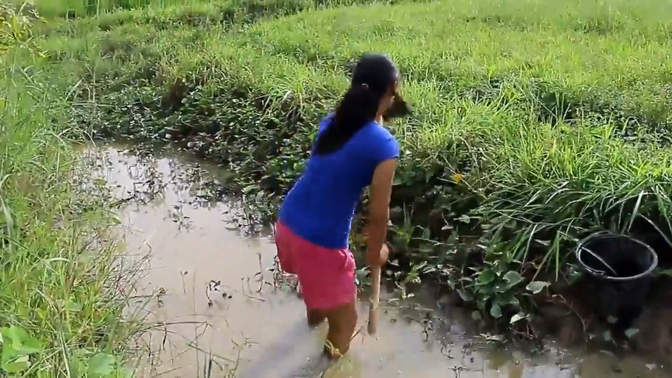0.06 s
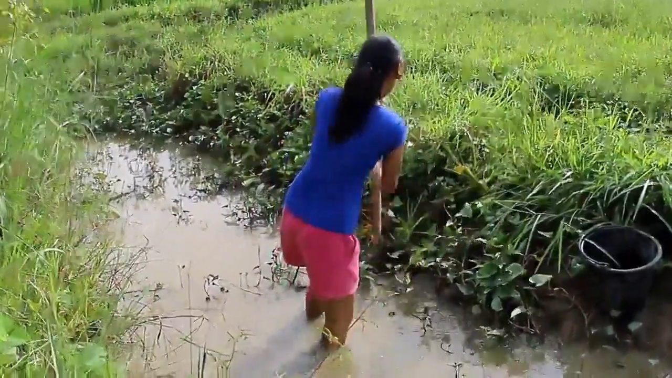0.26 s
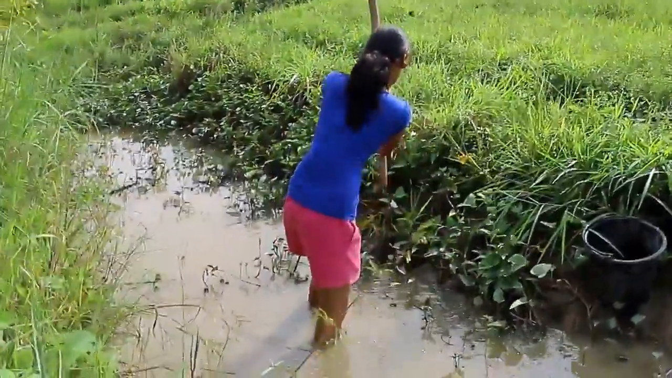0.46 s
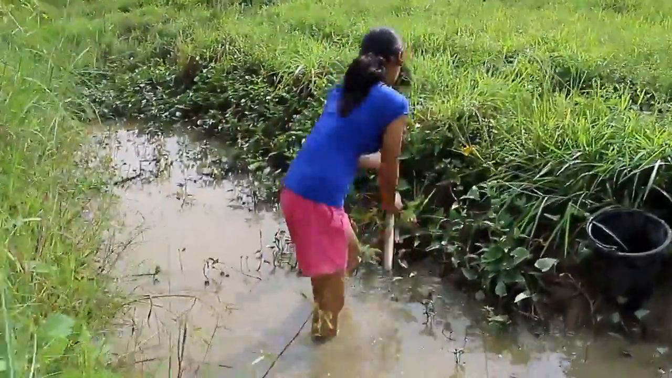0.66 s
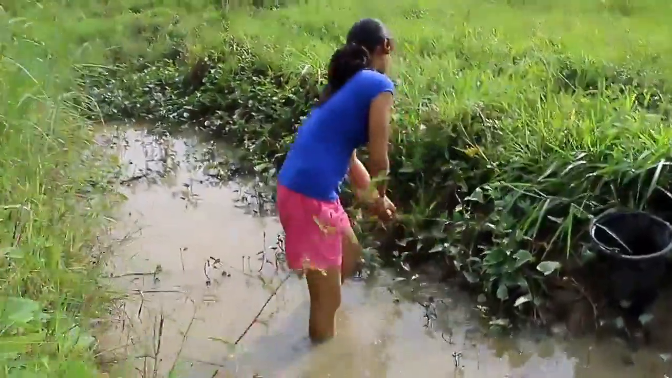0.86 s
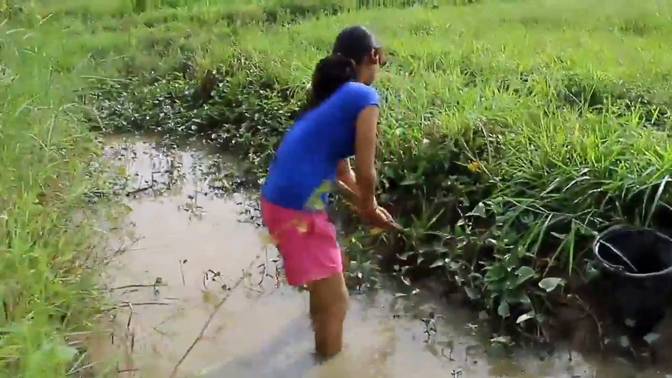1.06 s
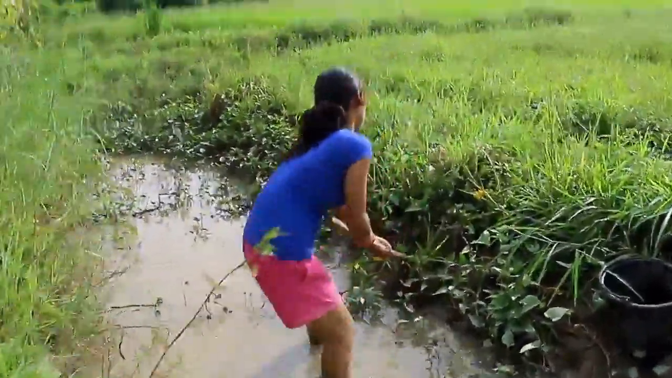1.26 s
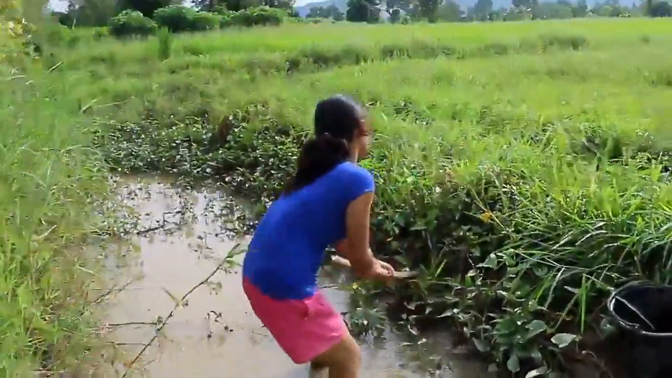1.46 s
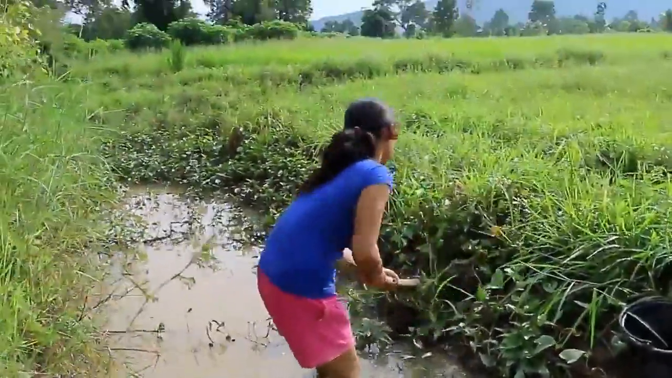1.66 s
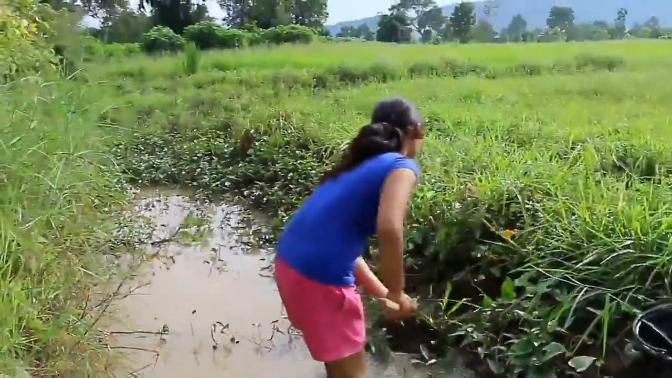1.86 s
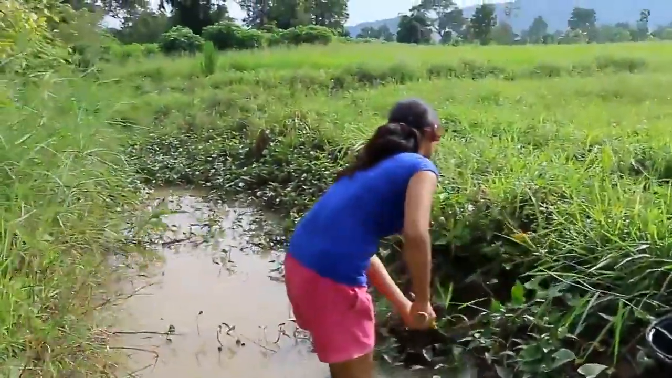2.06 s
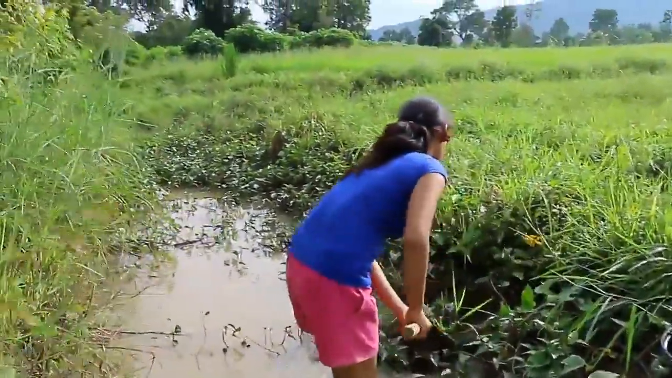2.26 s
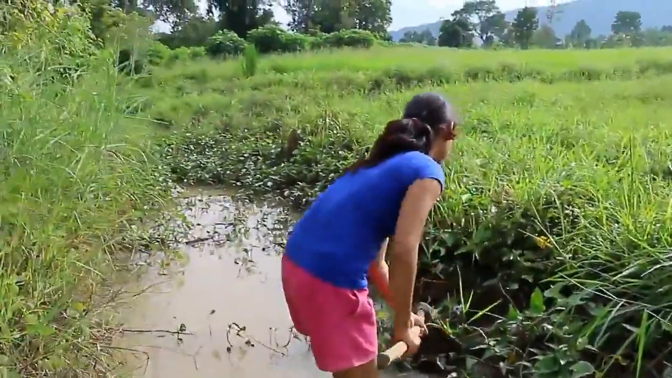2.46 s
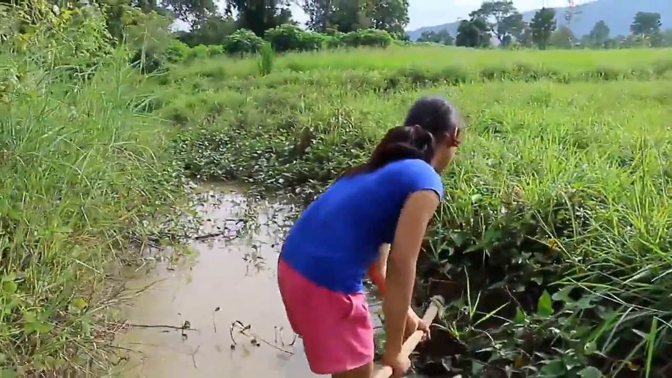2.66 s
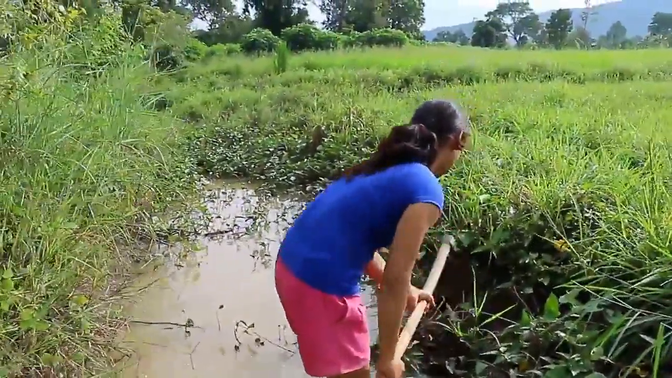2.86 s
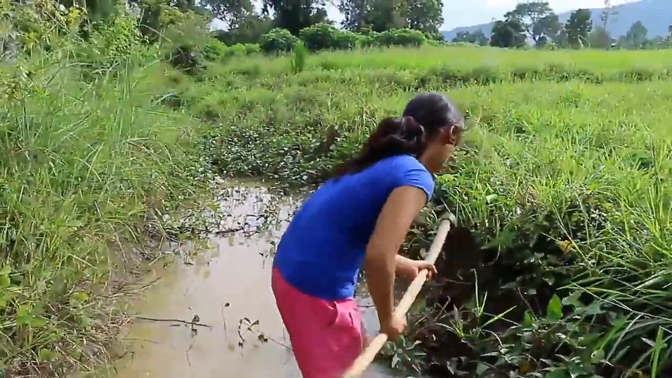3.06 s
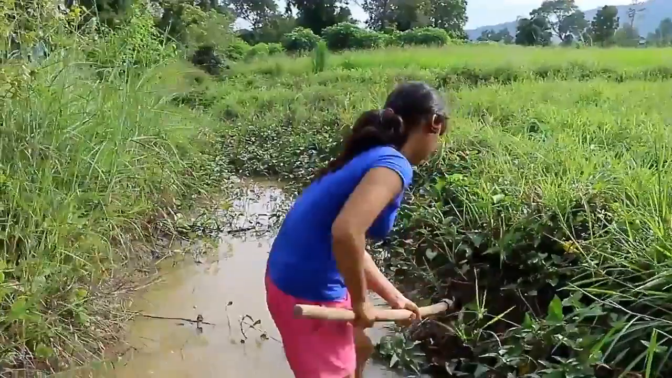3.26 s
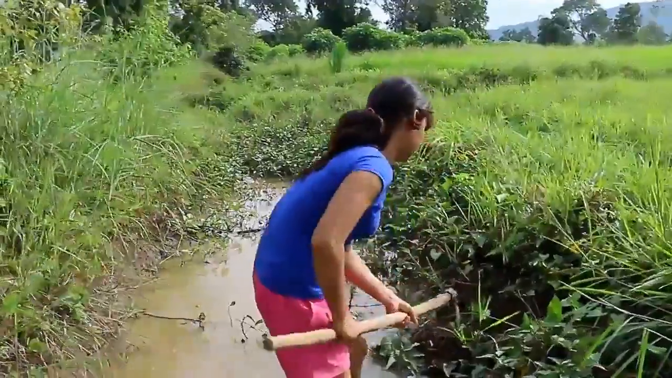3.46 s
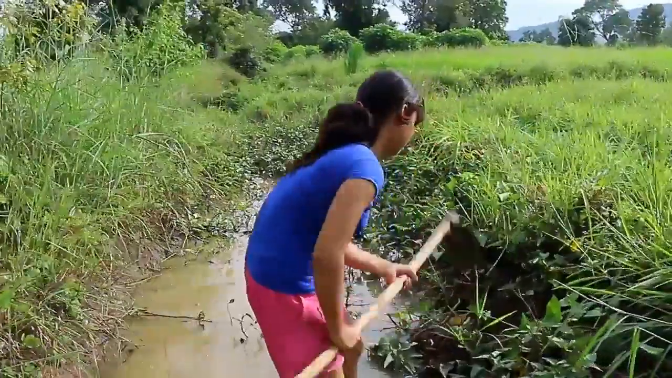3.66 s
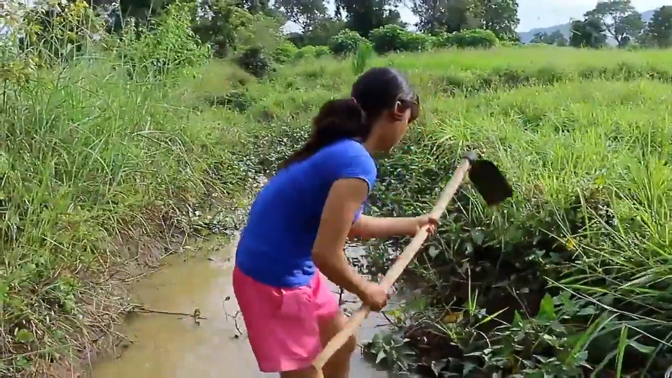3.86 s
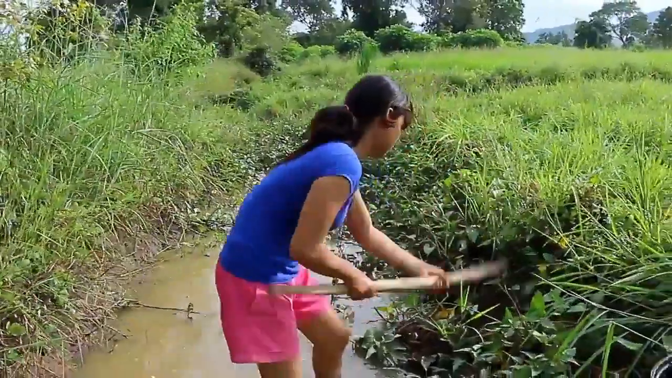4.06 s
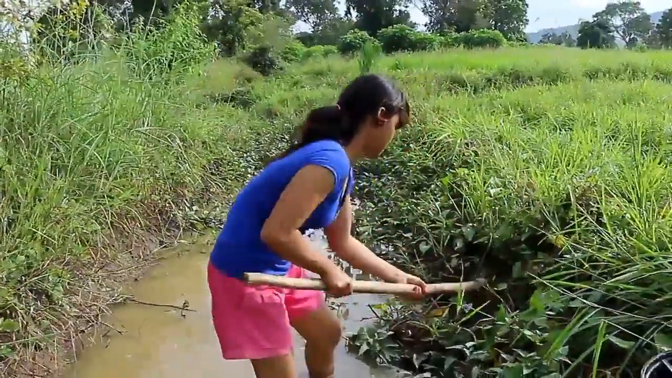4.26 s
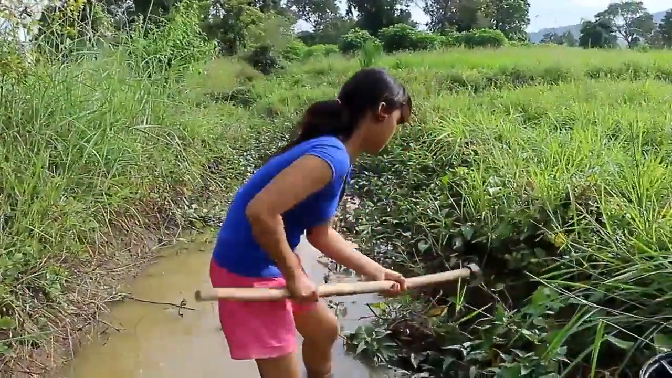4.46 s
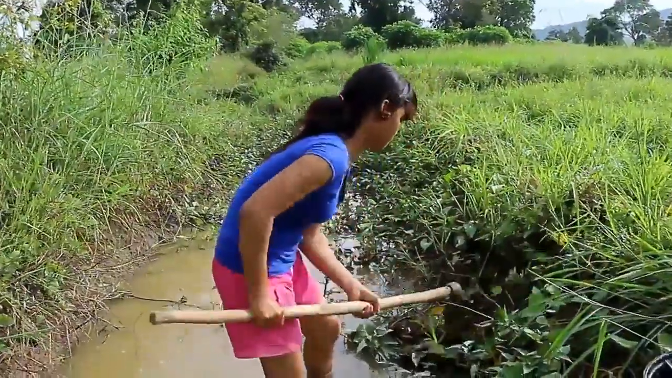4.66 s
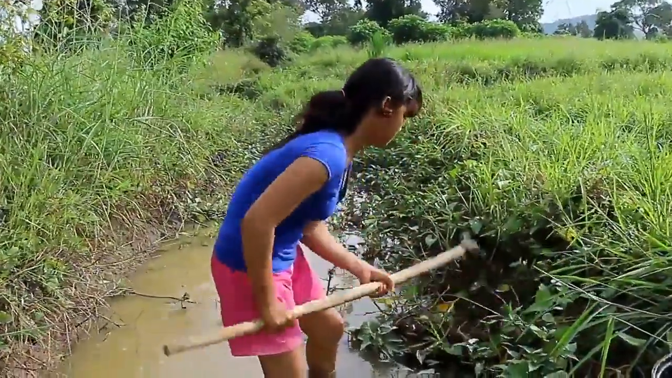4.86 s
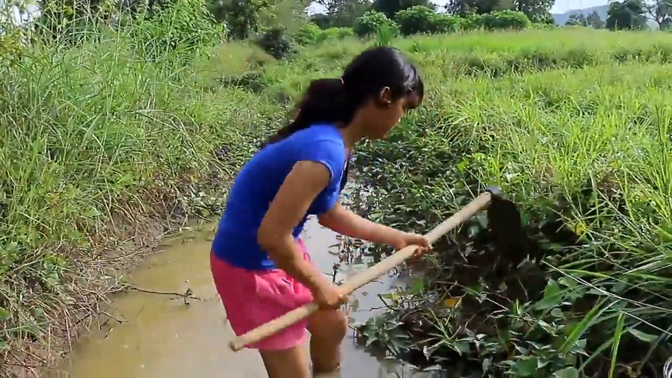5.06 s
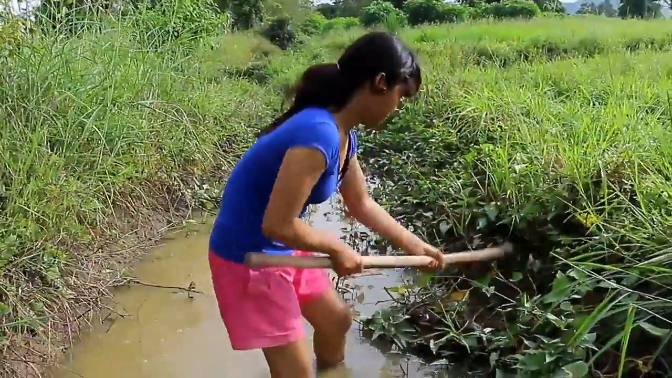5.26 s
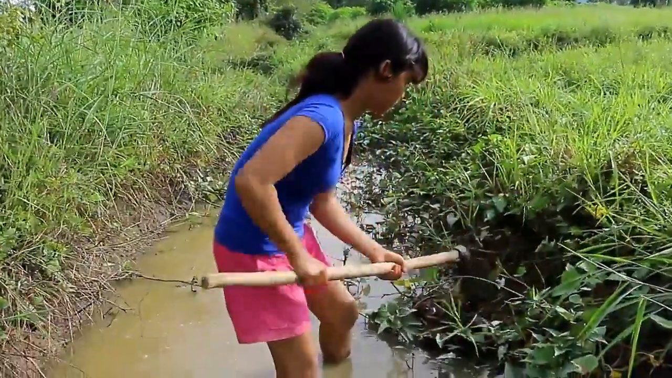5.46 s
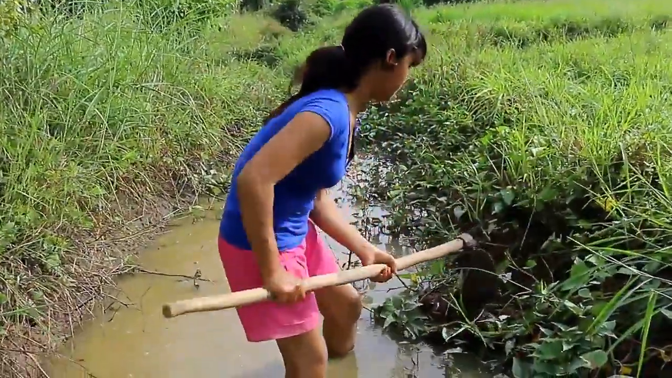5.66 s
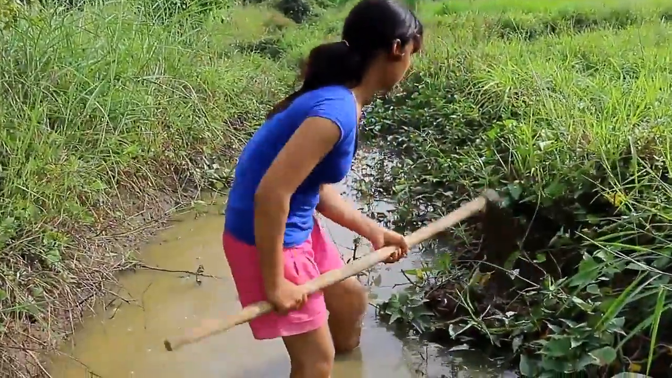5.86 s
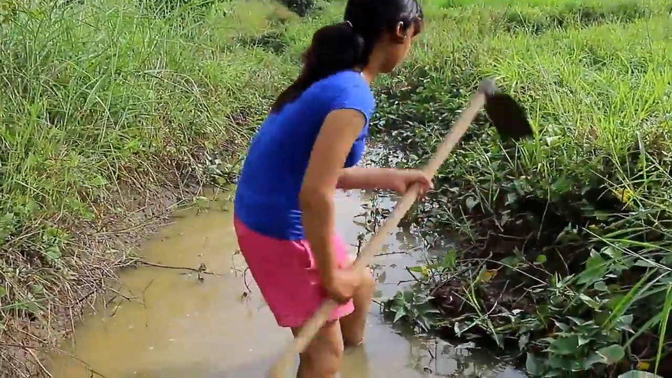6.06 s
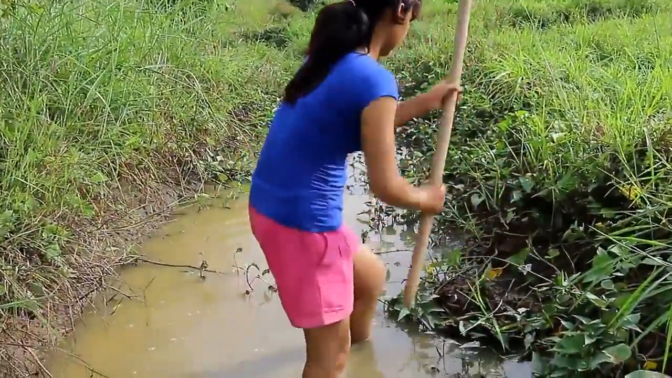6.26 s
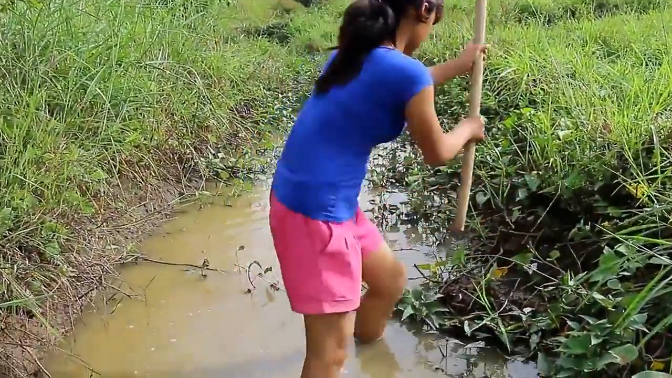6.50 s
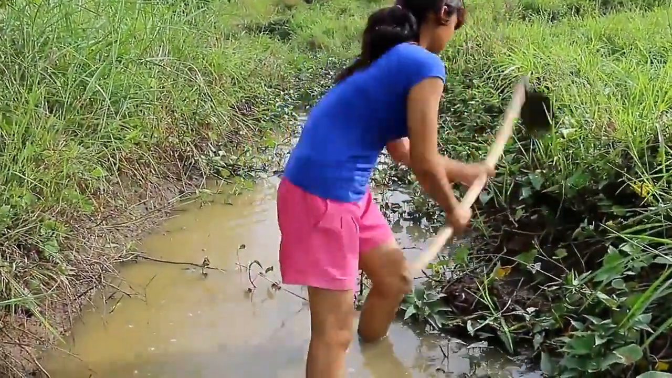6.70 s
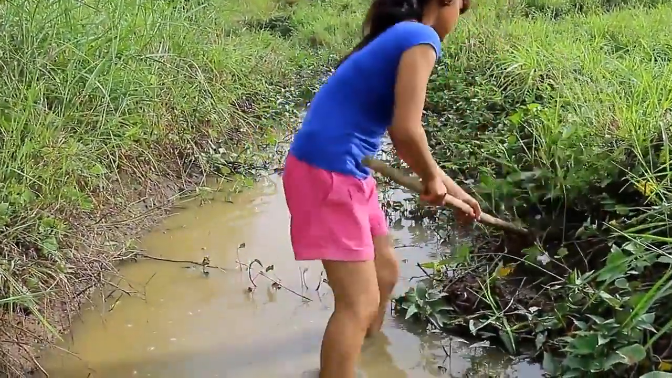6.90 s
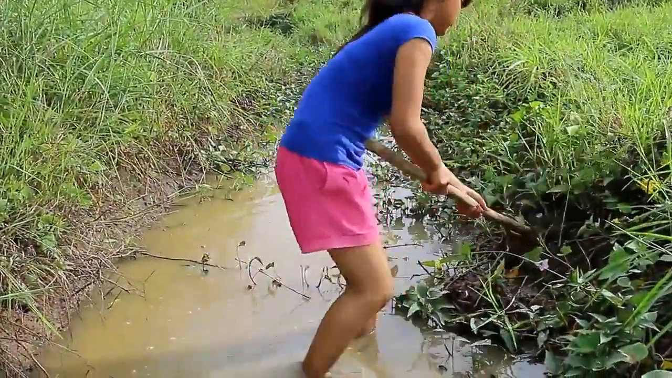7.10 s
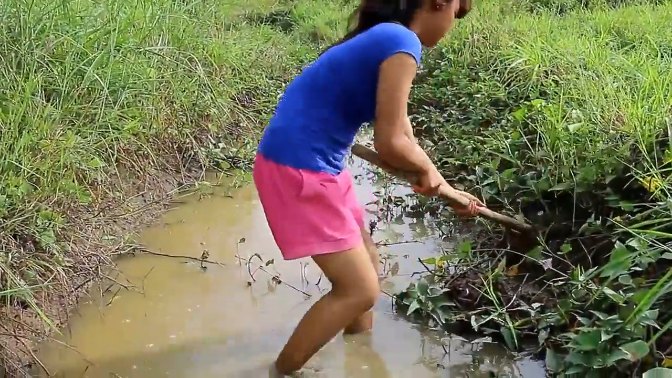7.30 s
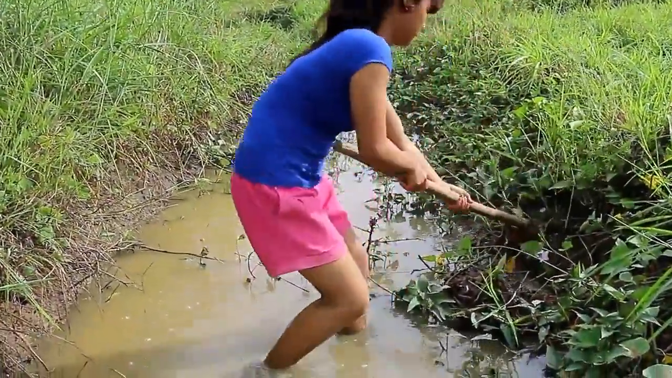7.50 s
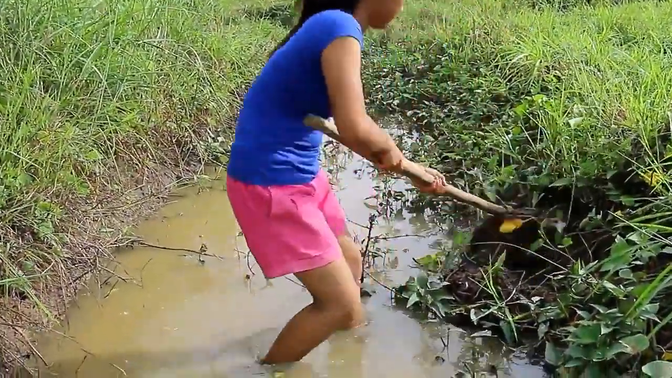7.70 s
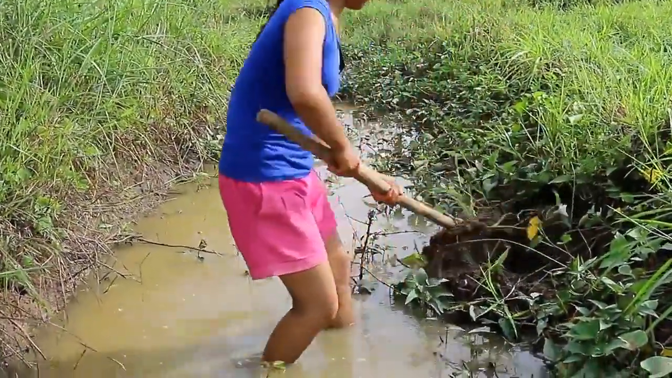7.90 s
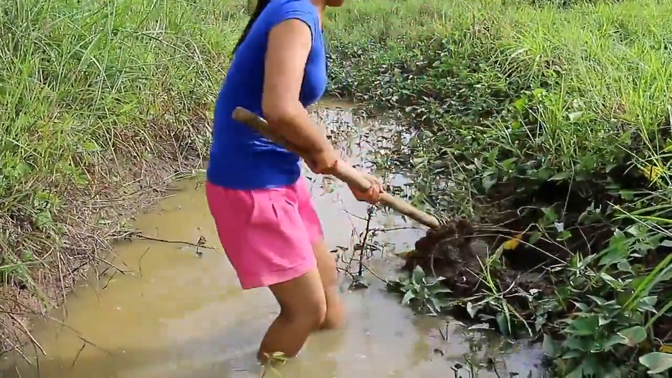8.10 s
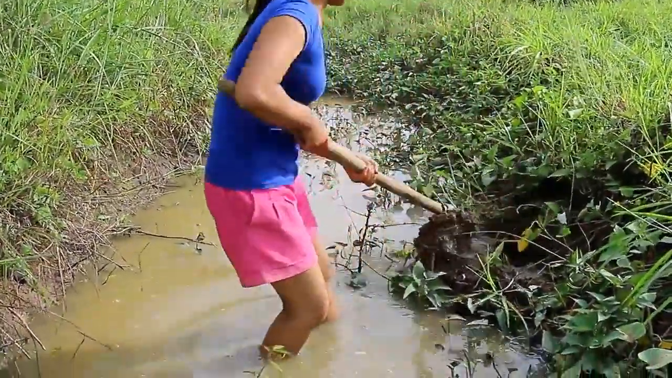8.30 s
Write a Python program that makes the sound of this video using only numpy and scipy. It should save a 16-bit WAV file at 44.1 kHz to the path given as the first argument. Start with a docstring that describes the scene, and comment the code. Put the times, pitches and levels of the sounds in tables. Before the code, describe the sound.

In an open field, a hoe tears through weeds and lands in mud with a sharp crack and thud. Legs then stir shallow ditch water into sloshes, plops and a splash. Lighter chops follow, then another hard one, and wet leaves rustle near the end. The work is close and central, while a frog croaks in short pulses on the right and a small bird trills on the left over faint insect buzz.

```python
"""A muddy ditch in an open field. A hoe chops at the weedy bank: the blade tears through stems and
lands with a crack and a thud. Shifting feet and dragged wet plants stir the water into bubbles,
slosh and spray. On the right a frog pulses its vocal sac, on the left a small bird trills in
falling slides. Behind them lie a far whistle, throbbing insect wings and a low, wavering hum."""
import sys
import numpy as np
from scipy import signal
from scipy.io import wavfile

SR = 44100
rng = np.random.default_rng(int(sys.argv[2]) if len(sys.argv) > 2 else 0)


def bounce(signal):
    """Save signal as a 16-bit WAV file at the path given by the first command-line argument."""
    frames = np.transpose(np.atleast_2d(signal))
    limited = np.clip(frames, -1, 1)
    pcm = np.round(limited * 32767).astype(np.int16)
    wavfile.write(sys.argv[1], SR, pcm)


N = 367794
TIME = np.arange(N) / SR


def amp(db):
    """Turn dB into gain."""
    return np.exp(np.asarray(db) * (np.log(10) / 20))


def rms_one(x):
    """Scale to rms 1."""
    return x / np.sqrt(np.mean(x ** 2) + 1e-20)


def at_hz(points, hz):
    """Read a curve on a log-frequency axis."""
    freqs, values = np.transpose(points)
    return np.interp(np.log(hz), np.log(freqs), values)


def drift(rate_hz):
    """A smooth random modulator with a spread of 1."""
    r = np.exp(-80 * np.pi * rate_hz / SR)
    slow = signal.lfilter([1], [1, -2 * r, r * r], rng.standard_normal(N // 40 + 2002))[2000:]
    return np.interp(np.arange(N) / 40, np.arange(len(slow)), rms_one(slow))


def ring(clicks, hz, t60):
    """A resonator: a unit click sets a sine of height 1 ringing."""
    r, w = amp(-60 / (t60 * SR)), 2 * np.pi * hz / SR
    return signal.lfilter([0, np.sin(w)], [1, -2 * r * np.cos(w), r * r], clicks + 1e-18)


def add(out, start, piece):
    """Mix a piece in at a start time in seconds."""
    i = round(start * SR)
    out[i:i + len(piece)] += piece[:N - i]


def placed(x, pan_db, lag):
    """Pan a mono sound: the left is louder by pan_db and late by lag samples."""
    late = np.interp(np.arange(N) - lag, np.arange(N), x)
    return np.array([late * amp(pan_db / 2), x * amp(-pan_db / 2)])


def crackle(per_s, spread_db, hiss):
    """Clumps of uneven clicks on a bed of noise, as a mid/side pair."""
    sizes = amp(spread_db * np.minimum(rng.exponential(1, N), 4))
    fires = rng.random(N) < per_s * amp(4 * drift(25)) / SR
    return (rms_one(sizes * fires) + hiss) * rng.standard_normal((2, N))


def crack(db, fade_db, top_hz):
    """A few milliseconds of band-passed noise, dying by fade_db each sample."""
    burst = amp(db + 4 - fade_db * np.arange(300)) * rng.standard_normal(300)
    return signal.sosfilt(signal.butter(2, [500, top_hz], "band", fs=SR, output="sos"), burst)


def glide(length, start_hz, end_hz):
    """A sine that slides in pitch under a rounded envelope."""
    u = np.arange(round(length * SR)) / (length * SR)
    hz = start_hz + (end_hz - start_hz) * u ** 1.4
    return 2 * np.sin(np.pi * u) ** .5 * np.sin(2 * np.pi * np.cumsum(hz) / SR)


def bubble(hz, cycles, rise):
    """A bubble rings out over some cycles; a positive rise lifts its pitch as it nears the surface."""
    t = np.arange(round(cycles / hz * SR)) / SR
    u = t * hz / cycles
    attack = np.minimum(t * hz / 2, 1)
    return 2 * attack * amp(-60 * u) * np.sin(2 * np.pi * hz * t * (1 + rise * u))


# Stereo image of far sound. Each row: frequency in Hz, left-right likeness from 0 to 1.
FAR_LIKENESS = [(60, 0.64), (600, 0.59), (2000, 0.37), (5000, 0.013)]

def coloured(white, spectrum, flicker_db, flicker_hz, far):
    """Shape mid/side noise in flickering half-octave bands; far sources spread wider. Stereo, rms 1."""
    out, shared = 0, drift(flicker_hz)
    edges = spectrum[0][0] * 2 ** np.arange(0, 10, .5)
    edges = np.append(edges[edges < spectrum[-1][0] / 1.1], spectrum[-1][0])
    sources = white, white * rng.choice([-1, 1], N)   # neighbouring bands must not cancel
    for k, (low, high) in enumerate(zip(edges, edges[1:])):
        band = signal.butter(2, [low, high], "band", fs=SR, output="sos")
        mid, side = signal.sosfilt(band, sources[k % 2])
        hz = np.sqrt(low * high)
        alike = np.clip(at_hz(FAR_LIKENESS, hz), 0, 1) ** far
        gain = amp(at_hz(spectrum, hz) + flicker_db * (shared + drift(flicker_hz)))
        out = out + gain * (np.sqrt(1 + alike) * mid + np.sqrt(1 - alike) * side * [[1], [-1]])
    return rms_one(out)


def echoes(x, t60, level_db):
    """Scatter from banks and grass: a short noise tail, its own in each channel."""
    t = np.arange(round(.25 * SR)) / SR
    tail = rng.standard_normal((2, len(t))) * amp(-60 * t / t60) * (t > .004)
    tail /= np.sqrt(np.sum(tail[0] ** 2))
    return amp(level_db) * signal.fftconvolve(x[None], tail, axes=1)[:, :N]


# EQ of the ambience bed. Each row: frequency in Hz, relative level in dB.
FIELD_EQ = [(20, -22), (91, -3), (241, -2.5), (640, -8.5), (1250, -12), (9430, -17.5), (15800, -31)]

def open_field():
    """A wide, soft noise bed leaning right, with a low wavering hum from far off."""
    bed = coloured(rng.standard_normal((2, N)), FIELD_EQ, flicker_db=.4, flicker_hz=2.65, far=1)
    hum = rms_one(ring(rng.standard_normal(N), hz=91.7, t60=.15))
    return amp(-54.5) * bed * amp([[-.8], [.8]]) + amp(-64) * hum


# The buzz climbs, then holds. Each row: time in seconds, pitch in Hz.
BUZZ_PITCH = [(0, 8700), (2.5, 9420)]
# It fades late. Each row: time in seconds, level in dB.
BUZZ_FADER = [(0, -68), (5.5, -68), (7, -75)]

def insects(throb_hz=8.5):
    """Wing buzz: a high, narrow band of noise that throbs."""
    carrier = np.sin(2 * np.pi * np.cumsum(np.interp(TIME, *np.transpose(BUZZ_PITCH))) / SR)
    flutter = signal.sosfilt(signal.butter(2, 280, fs=SR, output="sos"), rng.standard_normal((2, N)))
    throb = .65 + .35 * np.sin(2 * np.pi * throb_hz * TIME + drift(1))
    return amp(np.interp(TIME, *np.transpose(BUZZ_FADER))) * rms_one(carrier * flutter * throb ** 2)


# One far call: start in seconds, length in seconds, first and last pitch in Hz, level in dB.
FAR_CALL = (5.74, .255, 2700, 1860, -61)

def far_whistle():
    """A distant bird's whistle swells as it falls."""
    start, length, start_hz, end_hz, db = FAR_CALL
    whistle, slide = np.zeros(N), glide(length, start_hz, end_hz)
    add(whistle, start, amp(db + np.linspace(-10, 0, len(slide))) * slide)
    return whistle


# Bird phrases. Each row: first long slide in seconds, count of short notes before it,
# count of long slides, level in dB.
TRILLS = [(.884, 7, 3, -49), (2.785, 8, 3, -53), (4.278, 9, 3, -55), (5.815, 9, 3, -53), (7.45, 5, 4, -55)]

def small_bird():
    """Short notes build up to a run of long falling slides, all with a fluttering level."""
    song = np.zeros(N)
    for start, shorts, longs, db in TRILLS:
        for k in range(1, round(shorts) + 1):   # counted back from the first slide
            note = amp(db - 4 - .7 * k + rng.normal(0, 2)) * glide(.024, 6800, 6500)
            add(song, start - .01 - .042 * k, note)
        for k in range(round(longs)):
            slide = glide(.051, 7000, 6080)
            swell = amp(db + rng.normal(0, 1) + np.linspace(-4, 1, len(slide)))
            add(song, start - .004 + .069 * k, swell * slide)
    return song * amp(2 * drift(120))


# Croak cues. Each row: start in seconds, length in seconds, level in dB.
CROAK_CUES = [(0.367, 0.012, -39.5), (0.523, 0.042, -40), (0.722, 0.051, -39), (0.771, 0.013, -33.5),
              (0.875, 0.052, -43), (0.927, 0.041, -36.5), (1.013, 0.037, -42), (1.073, 0.039, -33),
              (1.152, 0.061, -44.5), (1.212, 0.044, -34), (1.297, 0.044, -39.5), (1.347, 0.049, -34.5),
              (1.449, 0.026, -38.5), (1.487, 0.04, -34), (3.421, 0.015, -42), (3.453, 0.049, -40.5),
              (3.591, 0.028, -43.5), (3.622, 0.033, -43.5), (3.661, 0.012, -40.5), (3.74, 0.024, -38),
              (3.807, 0.04, -41), (3.866, 0.015, -41.5), (3.886, 0.018, -37), (3.946, 0.02, -40.5),
              (4.025, 0.06, -41), (4.084, 0.037, -42), (4.162, 0.018, -36), (4.243, 0.035, -47),
              (6.421, 0.026, -40), (6.572, 0.024, -38.5), (6.651, 0.016, -39.5), (6.698, 0.054, -43.5),
              (6.923, 0.035, -42), (7.013, 0.012, -42.5), (7.045, 0.034, -41.5), (7.111, 0.055, -41.5),
              (7.212, 0.022, -41.5), (7.266, 0.038, -40.5), (7.354, 0.013, -38), (7.389, 0.03, -38.5),
              (7.478, 0.033, -46), (7.605, 0.027, -41)]
# The frog's base pitch. Each row: time in seconds, pulse rate in Hz.
CROAK_PITCH = [(1.09, 499), (1.23, 481.6), (1.5, 444.7), (3.4, 488.6)]
# Resonances of the vocal sac. Each row: centre in Hz, width in Hz, gain in dB.
SAC_FORMANTS = [(2678, 530, 7), (2270, 1700, -13.5), (1725, 320, -7.5)]

def frog():
    """Pulses ring the vocal sac, arching in pitch. Clear croaks swell; hoarse ones rasp and fade fast."""
    envelope, rough, arch = np.zeros((3, N))
    for start, length, db in CROAK_CUES:
        hoarse = np.clip(.2 * (-36 - db) + .2 * (start > 3), .12, .85)   # more if weak or late
        u = np.arange(round(length * SR)) / (length * SR)
        bow = np.sin(2.6 * u)
        fades = np.minimum(1, np.minimum(u, 1 - u) * length / .003)
        add(envelope, start, amp(db - 12 * hoarse * (u - .3) + 5 * (1 - hoarse) * (bow - .7)) * fades)
        add(rough, start, np.full(len(u), hoarse))
        add(arch, start, bow + rng.normal(0, .15))
    bend = 1 + .11 * arch + .02 * drift(15) + .13 * rough * drift(150)
    pulse_hz = np.interp(TIME, *np.transpose(CROAK_PITCH)) * bend
    pulses = np.diff(np.floor(np.cumsum(pulse_hz) / SR), prepend=0)
    pulses *= amp(9 * rough * np.tanh(drift(100)))
    source = rms_one(pulses) + .58 * rough * rng.standard_normal(N)
    voice = 0
    for k, (hz, width_hz, db) in enumerate(SAC_FORMANTS):
        r = np.exp(-np.pi * width_hz / SR)
        b, a = [(1 - r * r) / 2, 0, (r * r - 1) / 2], [1, -2 * r * np.cos(2 * np.pi * hz / SR), r * r]
        voice = voice + (-1) ** k * amp(db) * signal.lfilter(b, a, signal.lfilter(b, a, source))
    return envelope * rms_one(voice)


# Legs and dragged weeds stir the ditch. Each row: time in seconds, slosh in dB, leaf rustle in dB.
STIR_FADERS = [(0, -50.5, -52.5), (.5, -68, -62), (.95, -51.5, -49.5), (1.45, -57.5, -57.5),
               (1.75, -49.5, -44), (1.95, -43.5, -46), (2.2, -41, -66), (2.45, -51, -61),
               (2.62, -39.5, -56), (2.93, -46, -63), (3.07, -38, -71), (3.3, -44, -66),
               (3.619, -64.5, -57.5), (4.35, -49, -56.5), (4.741, -60.5, -53), (5.6, -67.5, -77),
               (7.4, -76, -79.5), (7.65, -57, -55.5), (7.901, -50, -41.5), (8.12, -50, -52.5),
               (8.34, -79, -52.5)]
# Single splashes. Each row: peak time in seconds, water level in dB, spray level in dB.
SPLASH_CUES = [(0.049, -67, -53), (2.55, -47, -48), (2.776, -30, -47), (2.833, -39, -45.5),
               (3.318, -41, -40), (5.474, -44.5, -51.5), (6.431, -71.5, -54), (8.27, -78, -47)]

def stirred(column, rise_s):
    """Gain of the stirring plus a swell for each splash, which fades in twice its rise time."""
    faders = np.array(STIR_FADERS)
    power = amp(2 * np.interp(TIME, faders[:, 0], faders[:, column]))
    for peak, db in np.array(SPLASH_CUES)[:, [0, column]]:
        near = slice(max(round((peak - 3 * rise_s) * SR), 0), round((peak + 6 * rise_s) * SR))
        t = TIME[near] - peak
        power[near] += amp(2 * db) * np.exp(-(t / rise_s / (1 + (t > 0))) ** 2)
    return np.sqrt(power)


# Snapping stems. Each row: start in seconds, level in dB.
STEM_SNAPS = [(0.041, -30.5), (1.94, -25.5)]
# EQ of wet leaves. Each row: frequency in Hz, relative level in dB.
RUSTLE_EQ = [(590, -60), (1000, -40), (2130, -5.5), (6050, -13), (15500, -24)]

def wet_leaves():
    """Leaves drag and spray falls: dense crackle with small drips, and single stems snapping."""
    snaps, drips = np.zeros((2, N))
    for start, db in STEM_SNAPS:
        add(snaps, start, crack(db, fade_db=.16, top_hz=6400))
    for when, pitch, size in rng.random((1500, 3)):
        drip = bubble(1100 * 4 ** pitch, cycles=6 + 14 * size, rise=.05)
        add(drips, when * N / SR, amp(-20 * size) * drip)
    rustle = coloured(crackle(2500, 2.5, 1.2), RUSTLE_EQ, flicker_db=1.5, flicker_hz=12, far=.4)
    spray = placed(rms_one(drips * amp(4 * drift(200))), -.6, .5)
    return stirred(column=2, rise_s=.026) * (.9 * rustle + .45 * spray) + placed(snaps, -.51, .98)


# EQ of the slosh. Each row: frequency in Hz, relative level in dB.
SLOSH_EQ = [(88, -55), (150, -53), (293, -9), (605, -1), (901, 3.5), (4500, -13.5), (7000, -96)]
# Large bubbles. Each row: start in seconds, level in dB, pitch in Hz.
PLOP_CUES = [(2.056, -31, 1520), (2.155, -39, 408), (2.274, -38.5, 620), (2.375, -26, 757),
             (2.478, -38, 1500), (2.515, -20, 1750), (2.774, -35, 687), (2.826, -28, 680),
             (3.072, -25, 1060), (3.095, -30.5, 1000), (3.387, -33.5, 1084), (4.935, -41.5, 830),
             (4.974, -42, 950), (5.086, -42.5, 990), (5.221, -47, 754), (5.404, -28.5, 2900),
             (7.267, -42, 900.5), (7.929, -31.5, 1481), (7.955, -34, 960), (8.246, -33, 2400),
             (8.331, -32, 1800)]
# Air pockets that sing while their size changes. Each row: start in seconds, length in seconds,
# first and last pitch in Hz, level in dB.
GURGLE_CUES = [(2.377, 0.026, 770, 1300, -44), (2.639, 0.12, 647, 552, -49), (3, 0.099, 591, 429, -47),
               (3.173, 0.018, 1440, 1060, -37), (7.314, 0.031, 580, 446, -49.5),
               (7.515, 0.031, 771, 880, -41)]

def ditch_water():
    """A clumped swarm of small bubbles over sloshing noise, with plops and gurgles on top."""
    swarm, plops = np.zeros((2, N))
    for when, pitch, faint, life in rng.random((2400, 4)):
        hz = 240 * 10 ** pitch
        small = bubble(hz, cycles=min(12 + 60 * life ** 4, hz / 10), rise=.4 * (faint - .4) * life)
        add(swarm, when * N / SR, amp(at_hz(SLOSH_EQ, hz) - 12 * faint) * small)
    for start, db, hz in PLOP_CUES:
        add(plops, start, amp(db) * bubble(hz, cycles=24, rise=.1))
        add(plops, start, crack(db - 12, fade_db=.1, top_hz=2.5 * hz))   # the wet smack that opens it
    for start, length, start_hz, end_hz, db in GURGLE_CUES:
        add(plops, start, amp(db) * glide(length, start_hz, end_hz))
    wash = coloured(rng.standard_normal((2, N)), SLOSH_EQ, flicker_db=2.5, flicker_hz=14, far=.15)
    swarm = rms_one(swarm * amp(2.5 * drift(12)))
    slosh = .75 * placed(swarm, -.8, 1.5) + .47 * wash
    plops *= amp(3.5 * np.tanh(drift(170)))   # they ring unevenly
    return stirred(column=1, rise_s=.03) * slosh + placed(plops, -.7, 1.49)


# Blade through weeds. Each row: entry, bite and hold in seconds, level in dB, decay in dB per second.
CHOP_CUES = [(0.791, 0.829, 0.021, -20.5, 1093), (4.129, 4.195, 0.0033, -32.5, 453),
             (4.473, 4.509, 0.006, -42.5, 222), (5.38, 5.381, 0.039, -41, 262),
             (6.806, 6.859, 0.0029, -23.5, 314)]

def chop_envelopes():
    """The tearing swells up to the bite, holds and dies; mud and drops spatter down after the bite."""
    tearing, spatter = np.zeros((2, N))
    entry_depth_db, spatter_db, spatter_db_per_s = 18.5, -17, 70
    t = np.arange(SR // 4) / SR
    for enters, bites, hold, db, db_per_s in CHOP_CUES:
        swell = np.minimum(t / (bites - enters), 1) ** 1.17
        after = np.maximum(t - (bites - enters) - hold, 0)
        add(tearing, enters, amp(db - entry_depth_db * (1 - swell) - db_per_s * after))
        add(spatter, bites, amp(db + spatter_db - spatter_db_per_s * t) * (1 - 4 * t))
    return tearing, spatter


# Hits on stems and mud. Each row: start in seconds, then crack, knock and deep thud levels in dB.
BLADE_HITS = [(0.803, -30, -33, -47), (0.822, -17, -16.5, -5), (0.84, -12.5, -14, -38),
              (4.188, -32, -23.5, -26), (4.198, -38, -16.5, -30), (5.405, -32.5, -38, -39),
              (5.4273, -39, -28, -23), (5.5297, -39, -39, -21.5), (6.811, -32, -31.5, -33.5),
              (6.855, -17.5, -27, -10), (6.8878, -37, -28, -22.5)]
# Body of the hit, the thud first, then two knocks. Each row: pitch in Hz, gain in dB, t60 in seconds.
HOE_MODES = [(313, -9, 0.05), (866, 1, 0.017), (1496, -9.5, 0.023)]
# EQ of tearing weeds. Each row: frequency in Hz, relative level in dB.
TEARING_EQ = [(88, -5.5), (200, 1), (948, -14), (1870, -1), (3040, -4.5), (15500, -25)]

def hoe(crunch_db=-8):
    """Each chop rips weeds in a burst; each hit is a crack and a thud in handle and mud."""
    tearing, spatter = chop_envelopes()
    cracks, body = np.zeros((2, N))
    starts, crack_dbs, knock_dbs, thud_dbs = np.transpose(BLADE_HITS)
    for start, db in zip(starts, crack_dbs):
        add(cracks, start, crack(db, fade_db=.098, top_hz=6200))
    hits = [round(start * SR) for start in starts]
    for k, (hz, db, t60) in enumerate(HOE_MODES):
        clicks = np.zeros(N)
        clicks[hits] = amp((knock_dbs if k else thud_dbs) + db + rng.normal(0, .79, len(hits)))
        crunch = rms_one(ring(crackle(900, 3, .3)[0], hz, t60))   # breaking stems shake the handle
        body += ring(clicks, hz, t60) + amp(crunch_db + db) * tearing * crunch
    body = signal.sosfilt(signal.butter(2, 85, "high", fs=SR, output="sos"), body)   # the thuds carry no deep rumble below about 85 Hz
    rip = coloured(crackle(2500, 1.8, 1), TEARING_EQ, flicker_db=1.8, flicker_hz=40, far=.2)
    bright_rip = np.diff(rip, prepend=0)
    return tearing * rip + spatter * bright_rip + placed(cracks + body, .18, 1)


def scene():
    """The mix: frog right, bird left, the field all round and the ditch work in the centre."""
    croaks, song = frog(), small_bird()
    animals = placed(croaks, -6.5, 4.06) + placed(song, 8.2, -1.62) + placed(far_whistle(), -2.2, 1.7)
    animals += echoes(croaks, t60=.2, level_db=-8) + echoes(song, t60=.07, level_db=-4)
    return open_field() + animals + ditch_water() + wet_leaves() + hoe() + insects()


def record(dry):
    """Soft saturation rounds the peaks; a steep low-pass takes off the very top."""
    rounded = .7 * np.tanh(dry / .7)
    return signal.sosfilt(signal.cheby2(16, 70, 16050, fs=SR, output="sos"), rounded)


dry = scene()
out = record(dry)
bounce(out)
```